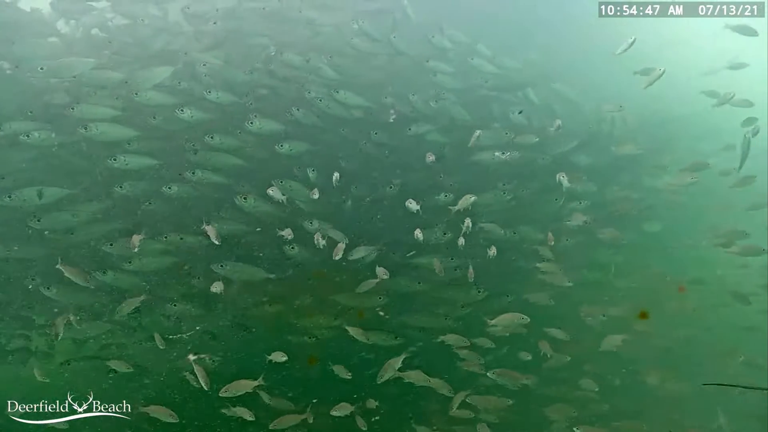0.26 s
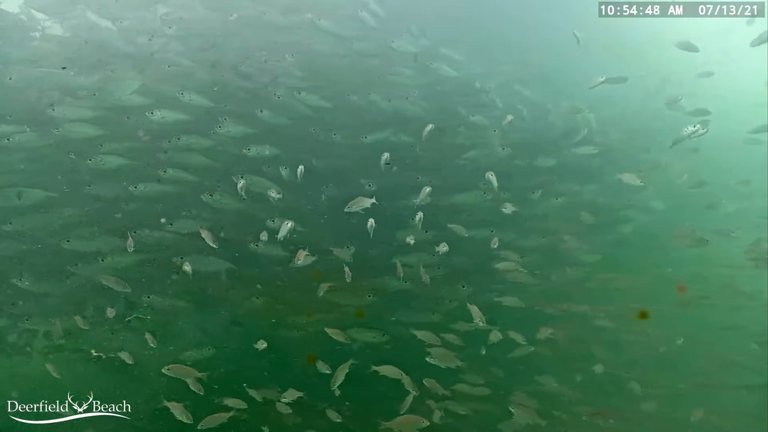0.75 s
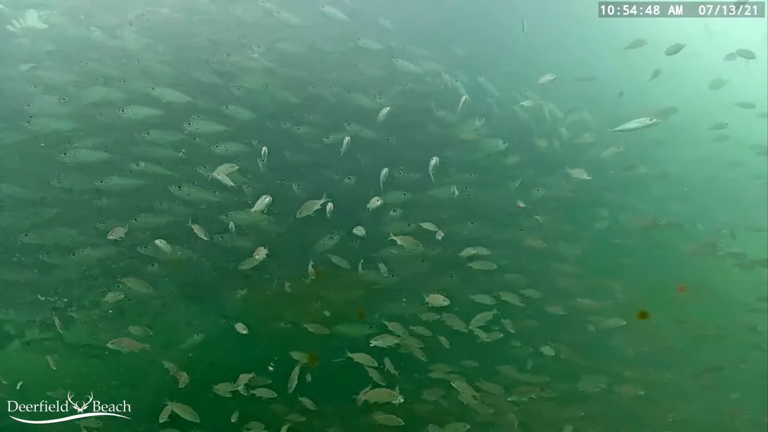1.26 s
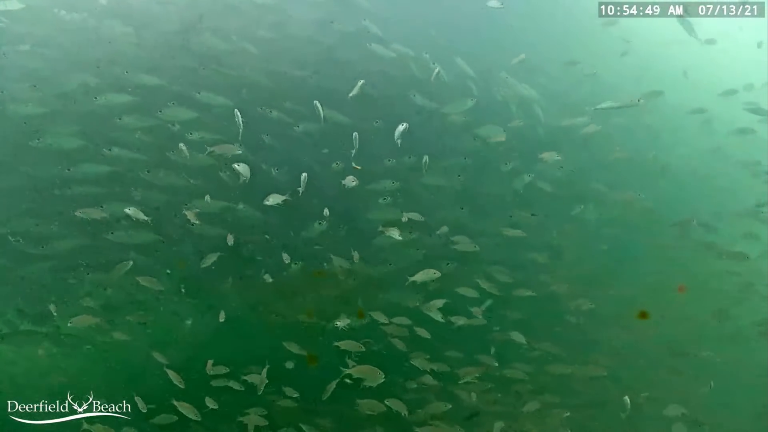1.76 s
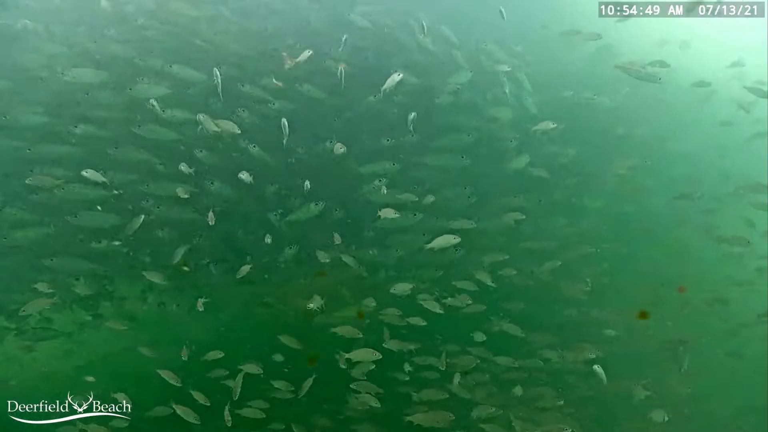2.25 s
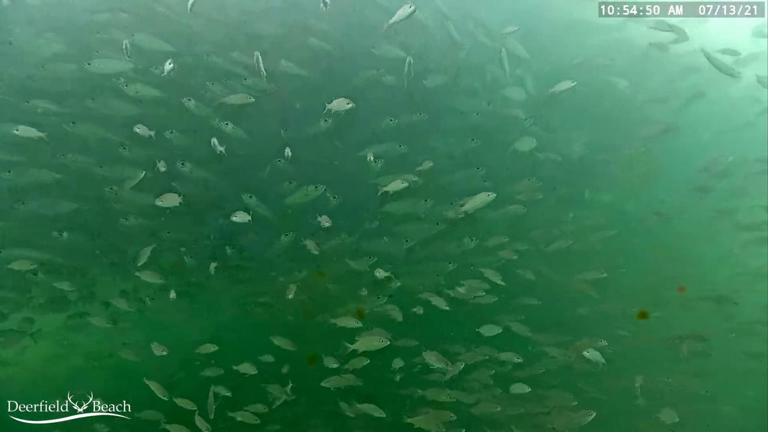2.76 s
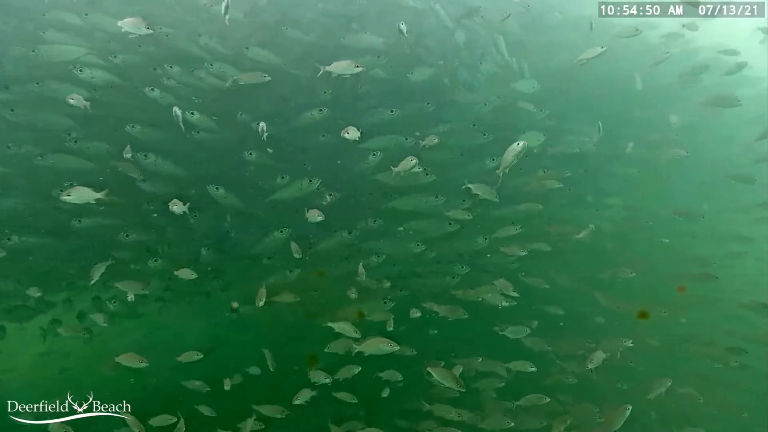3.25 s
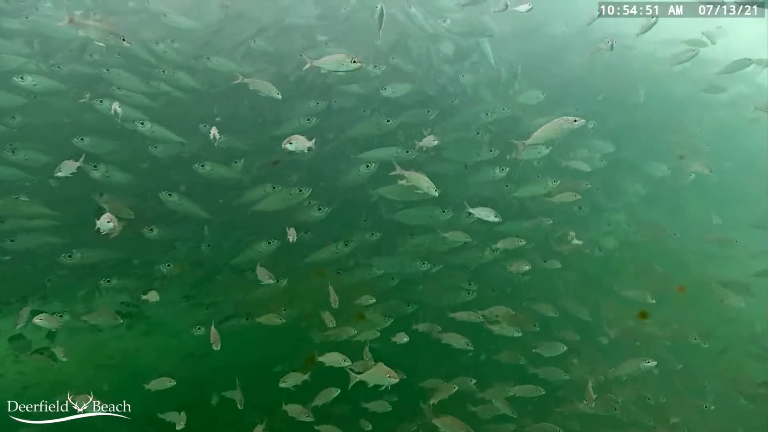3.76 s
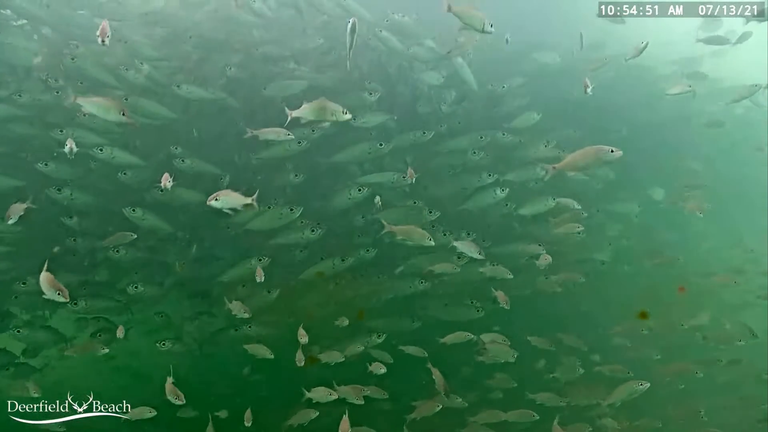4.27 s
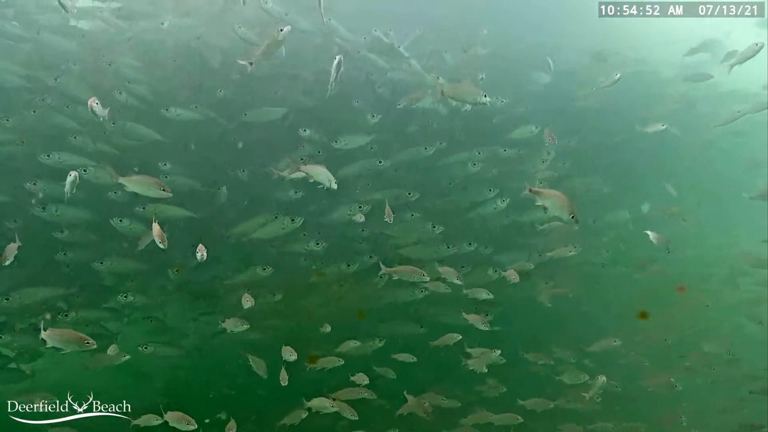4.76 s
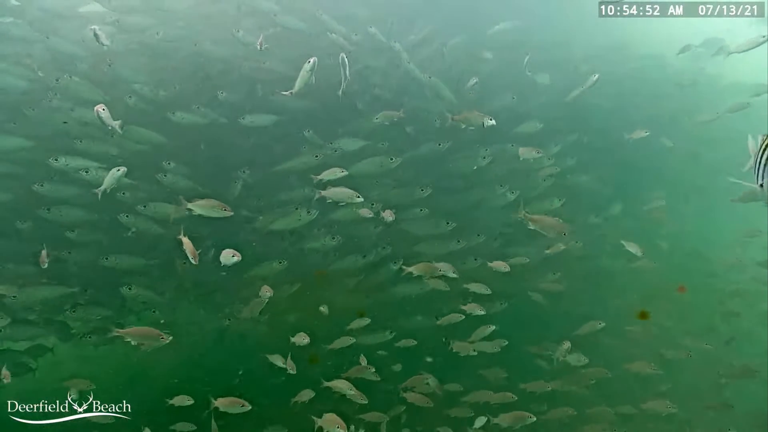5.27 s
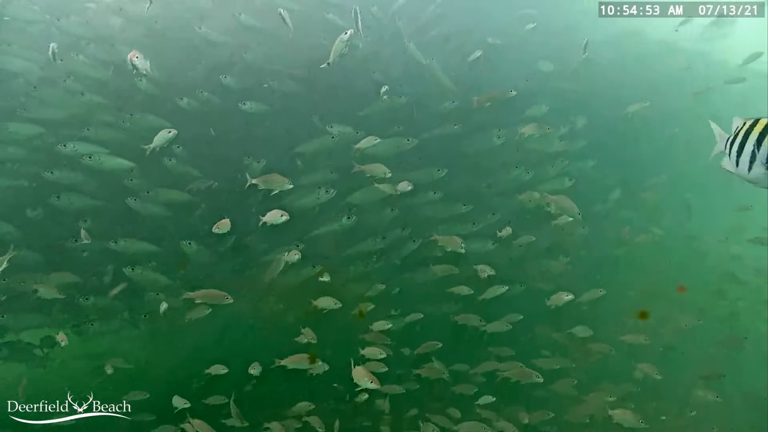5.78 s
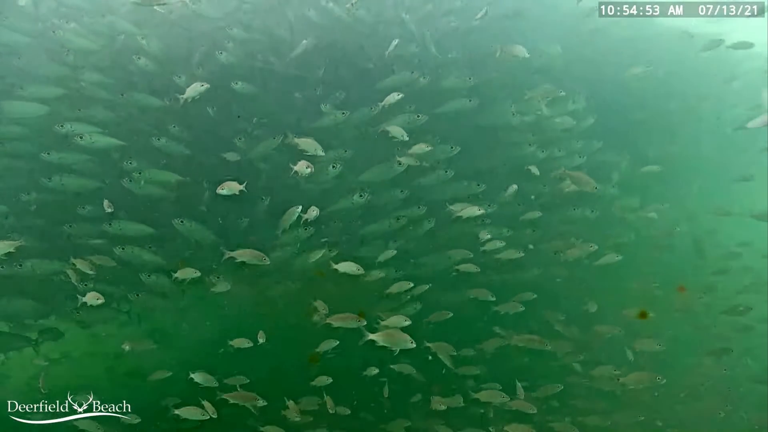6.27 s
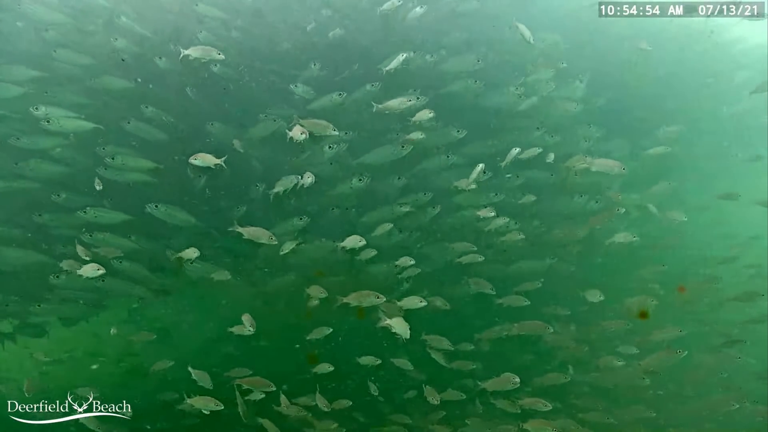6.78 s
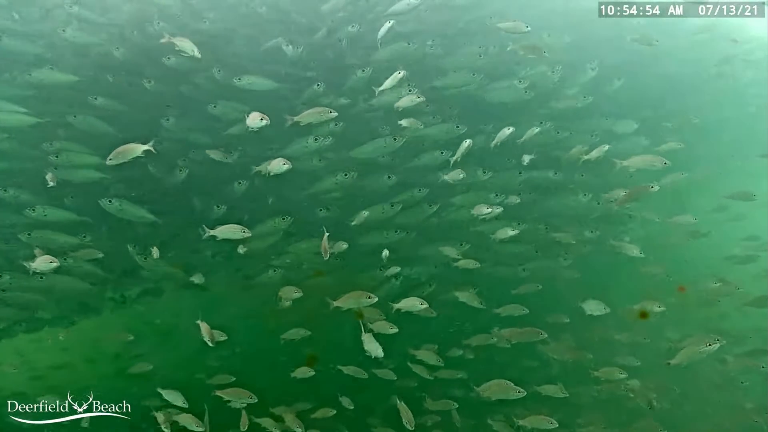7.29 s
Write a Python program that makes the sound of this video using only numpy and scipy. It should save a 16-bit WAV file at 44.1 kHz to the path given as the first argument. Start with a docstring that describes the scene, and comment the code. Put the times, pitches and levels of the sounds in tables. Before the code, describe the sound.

A bright coin clink, a dull bump and later a sharp chattering tap sound on a hard table, separated by quiet and tiny scratches. Then the coin drops into a spin, rattling round quickly with irregular knocks and woody resonance. Its turns gradually lengthen and the whirr swells and thins. The microphone is close, in a small lightly reverberant room with soft low rumble.

```python
"""A small room with a low ventilation rumble, one microphone close to a tabletop, one wall near by.
First a coin clinks as it is picked up; a soft bump and a hard tap on the tabletop follow, with small ticks between.
Then it lands spinning, bounces, and whirrs round on its rim to the end: the turns slow down, and each presses
the rim over the grain of the table. Bursts of tiny collisions drive the modes of the tabletop and, faintly, the coin."""
import sys
import numpy as np
from scipy import signal
from scipy.fft import rfft, irfft
from scipy.io import wavfile

SR = 44100
rng = np.random.default_rng(int(sys.argv[2]) if len(sys.argv) > 2 else 0)


def file_out(sig):
    """Save sig as 16-bit WAV at sys.argv[1]."""
    # one column per channel
    cols = np.atleast_2d(sig).T
    # limit, then scale
    lim = np.clip(cols, -1, 1)
    pcm = np.round(lim * 32767).astype(np.int16)
    wavfile.write(sys.argv[1], SR, pcm)


N = 332073  # length in samples


def from_db(db):
    """Decibels to gain."""
    return 10 ** (np.asarray(db) / 20)


def unit_energy(x):
    """Scale so that the squares sum to one."""
    return x / np.sqrt(np.sum(x ** 2) + 1e-20)


def at_hz(points, hz):
    """Read a spectrum on a log-frequency axis."""
    f, value = np.transpose(points)
    return np.interp(np.log(np.maximum(hz, 1)), np.log(f), value)


def in_time(curve, s):
    """Read a control curve at time s."""
    return np.interp(s, *np.transpose(curve))


def add(track, s, sound):
    """Mix a sound into the track from time s."""
    i = max(int(s * SR), 0)
    track[i:i + len(sound)] += sound[:max(N - i, 0)]


def through(x, response):
    """Pass a signal through an impulse response."""
    return signal.fftconvolve(x, response)[:N]


def resonance(x, hz, width):
    """Two-pole resonance with gain one at its top."""
    r = np.exp(-np.pi * width / SR)
    zeros = np.array([1, 0, -1]) * (1 - r * r) / 2
    poles = [1, -2 * r * np.cos(2 * np.pi * hz / SR), r * r]
    return signal.lfilter(zeros, poles, x + 1e-18)


def body(spectrum, modes=(), size=8192):
    """Impulse response of a struck thing: a causal broad colour plus its ringing modes; energy one."""
    log_gain = np.log(from_db(at_hz(spectrum, np.fft.rfftfreq(size, 1 / SR))))
    cepstrum = irfft(log_gain)
    # folding the cepstrum onto positive time makes the response minimum-phase
    broad = irfft(np.exp(rfft(np.r_[0, 2 * cepstrum[1:size // 2]], size)))
    ringing = sum(from_db(db) * resonance(broad, hz, width) for hz, width, db in modes)
    return unit_energy(broad + ringing)


# time a contact is given to build up before its peak (s)
LEAD_S = .07


def contact(rise, fall, per_s, spread_db, size=9000):
    """Force of many tiny collisions under a bell-shaped pressure that peaks after LEAD_S, with rms one there."""
    t = np.arange(size) / SR - LEAD_S
    side = np.where(t < 0, rise + 1e-6, fall)
    pressure = np.exp(-np.minimum((t / side) ** 2, 50))
    chance, strength, sign = rng.random(size), rng.standard_normal(size), rng.choice([-1, 1], size)
    hits = (chance < per_s / SR) * sign * from_db(spread_db * np.clip(strength, -2, 2))
    return unit_energy(pressure * hits) * np.sqrt(np.sum(pressure ** 2))


# colour of the background rumble, relative: f/Hz, level/dB
AIR_SPECTRUM = [(25, -32.5), (50, -10.5), (100, -6), (180, -1), (300, -6.5), (450, -10.5), (700, -17),
                (1070, -16), (1700, -26.5), (3000, -29), (5000, -37), (9000, -44), (16000, -48.5)]
# level of the background noise, before the air_db trim; it lifts in stretches, perhaps from hand
# or sleeve rustle: t/s, level/dB
AIR_LEVEL = [(0, -66.5), (.4, -65.5), (.6, -58.5), (1.75, -60), (1.95, -66), (2.58, -65.5), (2.801, -58.5),
             (3.0, -61.5), (3.15, -65.5), (3.4, -67), (3.7, -59), (7.53, -59.5)]
# ventilation tones; each passes twice through its resonance: f/Hz, width of one pass/Hz, rms level/dB
VENT_TONES = [(61, 14, -79), (185, 15, -76), (456.7, 7.1, -75), (2115, 110, -81)]


def ventilation(air_db=-0.73):
    """Background: soft low rumble of coloured noise, with a few wavering tones of narrow-band noise."""
    hz = np.maximum(np.fft.rfftfreq(N, 1 / SR), 1)
    white = rfft(rng.standard_normal(N))
    air = unit_energy(irfft(white * from_db(at_hz(AIR_SPECTRUM, hz)), N))
    level = from_db(air_db + in_time(AIR_LEVEL, np.arange(N) / SR))
    tones = np.zeros(N)
    for tone_hz, width, db in VENT_TONES:
        once = resonance(rng.standard_normal(N), tone_hz, width)
        tones += from_db(db) * unit_energy(resonance(once, tone_hz, width))
    return np.sqrt(N) * (level * air + tones)  # sqrt(N) turns energy one into rms one


# decay of the small room, time to fall 60 dB: f/Hz, t60/s
ROOM_T60 = [(150, 0.38), (500, 0.33), (1400, 0.27), (3700, .29), (9000, .25), (15000, 0.22)]


def room(x, wet_db=-8.0, echo_db=-14, echo_s=0.011, build_s=0.0099):
    """Direct sound, one near wall (about 3.8 m of extra path), then a diffuse tail that dies band by band."""
    t = np.arange(SR // 2) / SR
    white, hz = rfft(rng.standard_normal(len(t))), np.fft.rfftfreq(len(t), 1 / SR)
    edges = np.r_[0, np.geomspace(200, SR / 2, num=10)]
    tail = np.zeros(len(t))
    for low, high in zip(edges, edges[1:]):
        band = irfft(white * ((hz >= low) & (hz < high)), len(t))
        tail += band * from_db(-60 * t / at_hz(ROOM_T60, (low + high) / 2))
    build_up = 1 - np.exp(-(t / build_s) ** 2)
    response = from_db(wet_db) * unit_energy(tail * build_up)
    response[0] += 1
    response[int(echo_s * SR)] += from_db(echo_db)
    return through(x, unit_energy(response))


# ticks and slips of the coin against fingers and table:
# t/s of the peak, level/dB, centre f/Hz, octaves to the -6 dB point, fall/s
TICKS = [(0.925, -58, 8200, 0.24, 0.007), (0.93, -58, 4000, 1, 0.0055), (1.161, -65, 11400, 1, 0.028),
         (1.241, -71.5, 3800, 0.64, 0.08), (1.508, -59.5, 9500, 1, 0.0057), (1.548, -65, 11500, 1, 0.011),
         (1.689, -58.5, 14300, 0.29, 0.0088), (2.496, -49.5, 1478, .15, 0.003),
         (2.498, -58, 3724, 0.44, .003), (3.393, -48.5, 2060, 0.26, 0.0046), (6.9, -61.5, 9740, 0.69, 0.02),
         (6.978, -51.5, 9300, 1, .004)]


def ticks(rise_share=0.23, per_s=12000):
    """Light, short scratches of tiny collisions, each in a band of its own."""
    out, hz = np.zeros(N), np.geomspace(100, 20000, num=60)
    for s, db, centre_hz, octaves, length in TICKS:
        band_db = np.maximum(-6 * (np.log2(hz / centre_hz) / octaves) ** 2, -50)
        scratch = contact(rise_share * length, length, per_s, spread_db=1.0)
        sound = signal.fftconvolve(scratch, body(np.c_[hz, band_db], size=1024))
        add(out, s - LEAD_S, from_db(db) * sound)
    return out


# modes of the free coin, in close groups that beat: f/Hz, relative level/dB, t60/s
COIN_MODES = [(4382, -16.5, 0.78), (4485, -17, .65), (4462, -14.5, .85), (7580, -2, 0.38),
              (7600, -4.5, 0.37), (10160, -10.5, 0.48), (10210, -4.5, .36)]
# rough size of each mode's wavering (dB rms at the control points)
WAVER_DB = 2.5


def coin_ring(damping=1, tilt_db=0, count=45):
    """Coin after one touch, energy one: modes waver as it tilts; lying against the table damps and dulls it."""
    t = np.arange(SR) / SR
    lowest_hz = COIN_MODES[0][0]
    wavers = [np.interp(t, np.linspace(0, 1, count), rng.uniform(-1.7, 1.7, count)) for _ in COIN_MODES]
    ring = np.zeros(SR)
    for (hz, db, t60), waver in zip(COIN_MODES, wavers):
        start_db = db + tilt_db * np.log2(hz / lowest_hz)  # tilt in dB per octave
        level_db = start_db + WAVER_DB * waver - 60 * damping * t / t60
        ring += from_db(level_db) * np.sin(2 * np.pi * hz * t)
    return unit_energy(ring)


# the clink of the picked-up coin, broad colour: f/Hz, level/dB
CLINK = [(200, -45), (550, -5), (850, -13.5), (1200, 0.5), (2000, -0.5), (3200, -7.5), (7000, -14.5),
         (10000, -8.5), (16000, -22)]
# the soft bump, broad colour: f/Hz, level/dB
BUMP = [(60, -23), (200, -11), (500, -3), (1100, -6), (1500, -16.5), (2000, -23), (4200, -33),
        (6500, -49.5), (12000, -51), (16000, -52)]
# what rings with the bump: f/Hz, width/Hz, level/dB
BUMP_MODES = [(635, 290, -17), (1310, 150, 4), (4000, 200, 9), (5700, 120, 16), (7340, 170, 19),
              (10500, 240, 7)]
# the hard tap, broad colour: f/Hz, level/dB
TAP = [(100, -31), (300, -18), (600, -4), (1300, -2.5), (2700, 1.5), (4000, -0.5), (6000, -14.5),
       (8500, -20.5), (12000, -41), (16000, -43)]
# what rings with the tap: f/Hz, width/Hz, level/dB
TAP_MODES = [(1340, 77, 6), (1740, 30, 7.3), (1850, 40, 4.6), (2200, 26, 2.5), (2480, 60, 4), (2690, 22, 7),
             (3250, 30, 6), (3870, 60, 5), (4525, 30, 4.09), (5350, 40, 2), (5860, 40, 4), (7350, 49, 5)]


def handling(clink_db=-25, ring_db=-5.5, bump_db=-2, bump_bounce_db=-15, tap_db=-10.0):
    """Before the spin: a ringing clink, a soft bump that bounces once, and a hard, chattering tap."""
    out = np.zeros(N)
    clink = signal.fftconvolve(contact(0.0028, 0.0006, per_s=20000, spread_db=4.5), body(CLINK))
    tap = signal.fftconvolve(contact(.0005, 0.0068, per_s=12000, spread_db=7.0), body(TAP, TAP_MODES))
    bump = body(BUMP, BUMP_MODES)
    add(out, .3665 - LEAD_S, from_db(clink_db) * clink)
    add(out, .3665, from_db(ring_db) * coin_ring())
    add(out, .8905, from_db(bump_db) * bump)
    add(out, .924, from_db(bump_db + bump_bounce_db) * bump)
    add(out, 2.6175 - LEAD_S, from_db(tap_db) * tap)
    return out


# the rim bounces or slaps down; shared by thuds, rebounds and knocking: t/s, relative level/dB, treble/dB
KNOCKS = [(3.455, -10, 11.5), (3.4745, -11.5, 10.5), (3.481, -21, 22.5), (3.5453, -15, 11.5),
          (3.5946, -17.5, 24.5), (3.6457, -30.5, 24.5), (3.9091, -28, 12.5), (4.17, -38, -15.5),
          (4.3942, -25.5, 11.5), (4.405, -20.5, 6), (4.4439, -26, 10), (4.512, -23.5, -10),
          (4.6424, -34, -10.5), (4.7546, -25, -9), (4.9433, -25, 2), (5.431, -25, 18),
          (5.671, -29.5, -19.5), (5.834, -30.5, -15), (5.9494, -30.5, -3), (6.0819, -28.5, -3),
          (6.478, -32.5, 0.5), (6.6339, -23.5, 7.5), (6.689, -27.5, 3.5), (6.762, -24, -5)]
# the whole table giving under a knock, broad colour: f/Hz, level/dB
THUD = [(40, -31.5), (90, -15.5), (150, -1.5), (290, 2), (380, -6.5), (500, 8.5), (650, -2.5), (900, -20),
        (1500, -41), (5000, -68)]
# its low ringing after the knock: f/Hz, width/Hz, level/dB
THUD_MODES = [(150, 18, -2.5), (297.3, 22, 9), (481.3, 14, 8)]


def thuds(thud_db=8.0, growth=1.54, hardness_share=0.45):
    """Heavy knocks shake the whole table; light ones hardly move it, as level grows faster than force."""
    out, thud = np.zeros(N), body(THUD, THUD_MODES)
    for s, db, treble_db in KNOCKS:
        add(out, s, from_db(thud_db + growth * (db + hardness_share * treble_db)) * thud)
    return out


def rebounds(ring_db=-13, growth=1.3, damping=1.2, tilt_db=-6.0):
    """The metal sings on after each knock, disproportionately more after a strong, hard one."""
    out, ring = np.zeros(N), coin_ring(damping, tilt_db)
    for s, db, treble_db in KNOCKS:
        add(out, s, from_db(ring_db + growth * (db + treble_db)) * ring)
    return out


# how much of a contact's extra treble each frequency receives: f/Hz, share
HARDNESS = [(1300, 0.077), (2500, 0.31), (4000, 0.89), (6500, 0.9), (12000, 1.37)]


def harden(force, treble_db, patchy_db=2.5, count=26, size=512):
    """A harder contact lifts the treble along a broad slope; each spot on the table has a colour of its own."""
    hz = np.fft.rfftfreq(size, 1 / SR)[1:]
    spot = np.c_[np.geomspace(600, 14000, count), patchy_db * rng.uniform(-1.7, 1.7, count)]
    colour_db = treble_db * at_hz(HARDNESS, hz) + at_hz(spot, hz)
    gain = np.sqrt(np.mean(from_db(colour_db) ** 2))
    return gain * np.convolve(force, body(np.c_[hz, colour_db], size=size))


def knocking(rise_s=0.00163, fall_s=0.0056, per_s=12000, spread_db=3.5, level_db=-0.84):
    """Force of the knocks: each is a few milliseconds of tight chatter."""
    force = np.zeros(N)
    for s, db, treble_db in KNOCKS:
        chatter = harden(contact(rise_s, fall_s, per_s, spread_db), treble_db)
        add(force, s + rise_s - LEAD_S, from_db(db + level_db) * chatter)
    return force


# even slowing of the spin: every turn takes a little longer than the one before
FIRST_TURN_S, TURN_S, SLOWING_S_PER_TURN, TURN_COUNT = 3.488, .0512, .000356, 65
# the wobble runs a little ahead of or behind that even slowing: t/s, lateness/s
WOBBLE_LAG = [(3.498, -0.0048), (3.698, 0.0062), (4.002, -0.0012), (4.499, -0.0097), (4.778, 0.0081),
              (5.44, -.002), (5.5, -0.011), (5.681, -0.019), (5.78, .014), (6.102, .014), (6.171, 0.004),
              (7.49, -.004)]
# how hard the rim presses on the table as the coin leans and rights itself: t/s, level/dB
PRESSURE = [(3.49, -23.5), (3.7, -23), (3.85, -24.5), (4.02, -29), (4.13, -35), (4.27, -23.5), (4.51, -29),
            (4.7, -53.5), (4.76, -29.5), (4.89, -26.5), (5.07, -26.5), (5.14, -34), (5.36, -26), (5.6, -33),
            (5.77, -41), (5.97, -27.5), (6.04, -34.5), (6.1, -26.5), (6.35, -34), (6.52, -23.5),
            (6.7, -27.5), (6.84, -35), (6.91, -30), (7.05, -35.5), (7.13, -30), (7.3, -55.5), (7.42, -35),
            (7.5, -41)]
# hardness of the rim's contact: t/s, treble/dB
RIM_TREBLE = [(3.5, 12.5), (3.75, 3.5), (4.12, -23), (4.27, -4.5), (4.45, -15), (4.58, -23.5), (4.77, -4.5),
              (5.4, -13), (5.75, -23.5), (6.36, -19.5), (6.64, -5.5), (6.84, -21), (6.99, 0), (7.13, -1),
              (7.49, -5)]
# swell and fade of a turn (s) at a typical pressure (dB); a harder press lasts longer (dB of length per dB)
TURN_RISE_S, TURN_FALL_S, TYPICAL_DB, LENGTH_FOLLOWS = 0.013, 0.013, -24.5, 0.33
# chance differences from turn to turn
TURN_SCATTER_DB, TREBLE_SCATTER_DB, LENGTH_SCATTER_DB = 1, -1, 1.0


def rolling(per_s=2800, spread_db=3.0):
    """On each turn the rim rattles over the grain of the table; pressure sets its level and length."""
    force, n = np.zeros(N), np.arange(TURN_COUNT)
    even_times = FIRST_TURN_S + TURN_S * n + SLOWING_S_PER_TURN * n ** 2 / 2
    times = even_times + in_time(WOBBLE_LAG, even_times)
    for s, (louder, harder, longer) in zip(times, rng.standard_normal((TURN_COUNT, 3))):
        db = in_time(PRESSURE, s) + TURN_SCATTER_DB * louder
        treble_db = in_time(RIM_TREBLE, s) + TREBLE_SCATTER_DB * harder
        stretch = from_db(LENGTH_FOLLOWS * (db - TYPICAL_DB) + LENGTH_SCATTER_DB * longer)
        rattle = contact(TURN_RISE_S * stretch, TURN_FALL_S * stretch, per_s, spread_db)
        add(force, s - LEAD_S, from_db(db) * harden(rattle, treble_db))
    return force


# broad response of the tabletop: f/Hz, level/dB
TABLE_SPECTRUM = [(60, -40.5), (150, -15.5), (350, -16), (550, -12.5), (900, 1.5), (1700, -2.5), (2700, 1),
                  (3800, -9.5), (4800, -16), (6100, -21), (7800, -28), (10000, -38.5), (13000, -55),
                  (16000, -59)]
# resonances of the tabletop under the rim, before the modes_db lift: f/Hz, width/Hz, relative level/dB
TABLE_MODES = [(487.6, 20, 5), (686, 29, 4), (952, 56, 2.5), (1040, 84, -12), (1145, 20, 2.5),
               (1355, 40, 1), (1603, 15, 11), (1685, 87, 6), (1840, 29, 1), (1976, 19, 5), (2063, 22, 4),
               (2267, 28, -0.5), (2317, 220, -1), (2340, 74, -9), (2697, 26, -1), (2990, 30, 1),
               (3110, 30, 1.5), (3580, 35, -3), (3820, 90, 6), (4425, 38, 1.5), (4530, 30, 4.5),
               (5120, 24, 0.5), (5590, 90, -5.5), (6720, 82, -8), (6820, 200, -1), (7300, 55, 1.5),
               (7746, 120, 2.5), (8400, 110, 1)]


def tabletop(force, modes_db=3.0, wander_db=3.5, count=110):
    """The contact point travels, so each mode is driven now more, now less."""
    broad = through(force, body(TABLE_SPECTRUM))
    out = broad.copy()
    for hz, width, db in TABLE_MODES:
        points = rng.uniform(-1.7, 1.7, count)
        wander = np.interp(np.linspace(0, count - 1, N), np.arange(count), points)
        out += resonance(broad * from_db(db + modes_db + wander_db * wander), hz, width)
    return out


def spinning_coin(table_db=-6.0, ring_db=-41):
    """Main source: the rim's force sounds the tabletop and, faintly, the damped coin."""
    force = rolling() + knocking()
    ring = through(force, coin_ring(damping=3.2, tilt_db=-13))
    return from_db(table_db) * tabletop(force) + from_db(ring_db) * ring


def scene():
    """Coin and table in the room, over the ventilation; one channel."""
    coin = spinning_coin() + thuds() + rebounds() + handling() + ticks()
    return (room(coin) + ventilation())[None]


def record(dry):
    """The microphone signal is clipped at full scale, then steeply cut above 15.9 kHz."""
    low_pass = signal.ellip(12, .1, 80, 15900, fs=SR, output="sos")  # 0.1 dB ripple, 80 dB stop band
    return signal.sosfilt(low_pass, np.clip(dry, -1, 1))


dry = scene()
out = record(dry)
file_out(out)
```